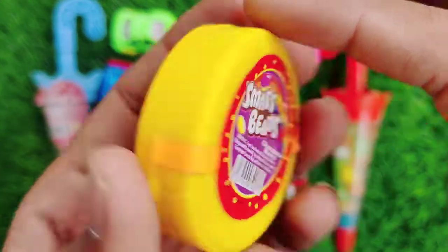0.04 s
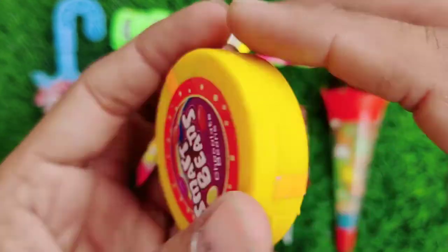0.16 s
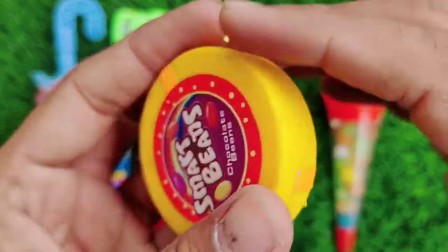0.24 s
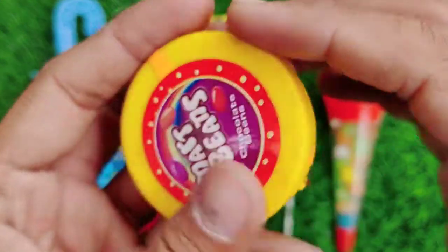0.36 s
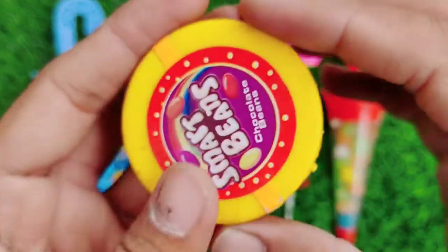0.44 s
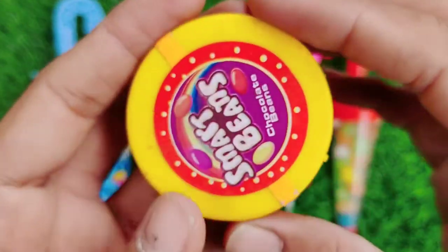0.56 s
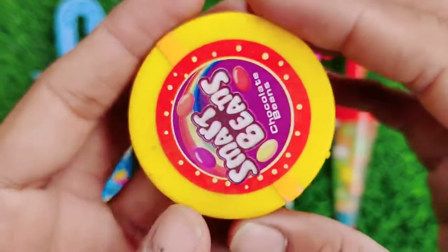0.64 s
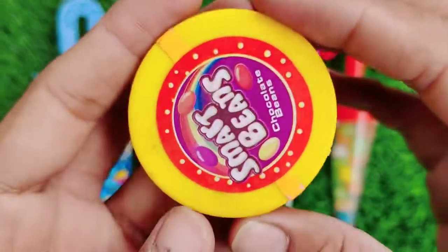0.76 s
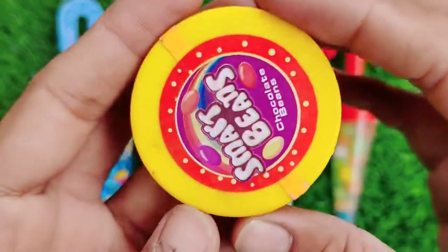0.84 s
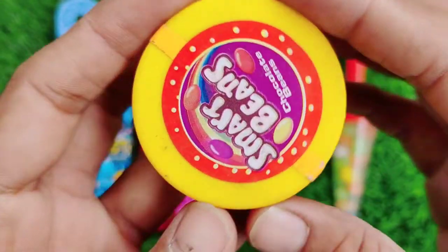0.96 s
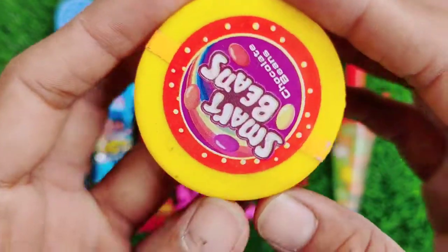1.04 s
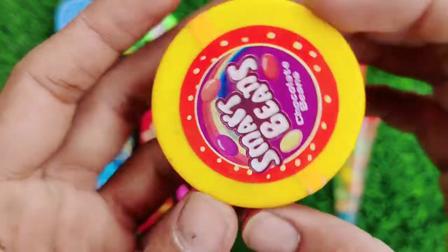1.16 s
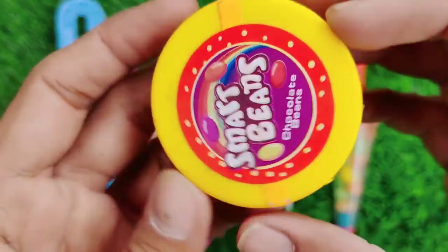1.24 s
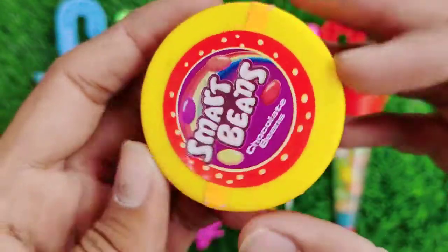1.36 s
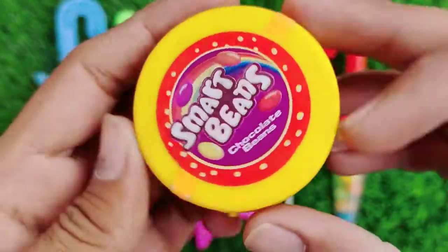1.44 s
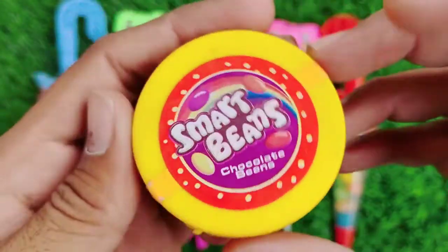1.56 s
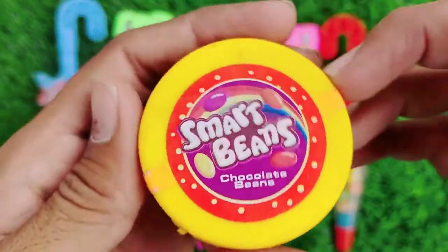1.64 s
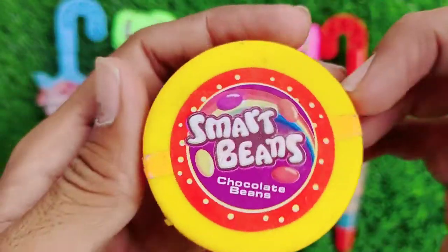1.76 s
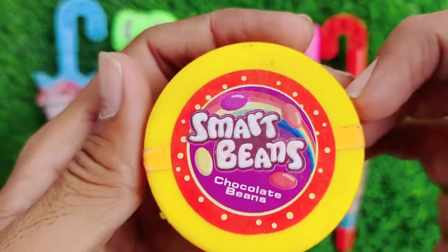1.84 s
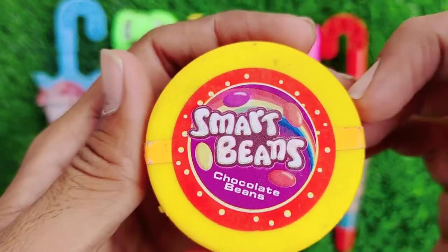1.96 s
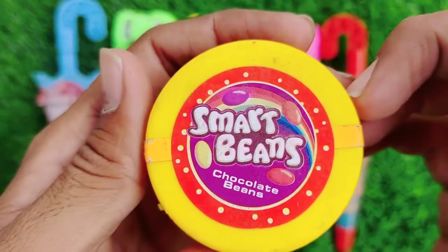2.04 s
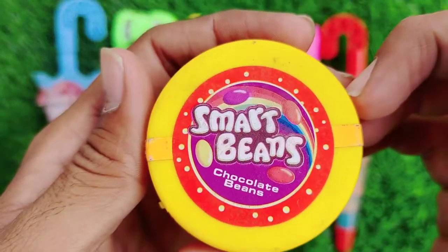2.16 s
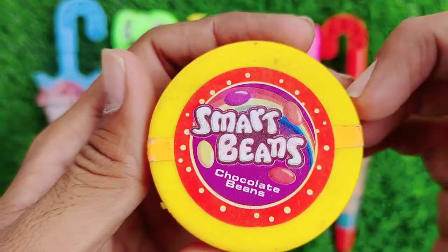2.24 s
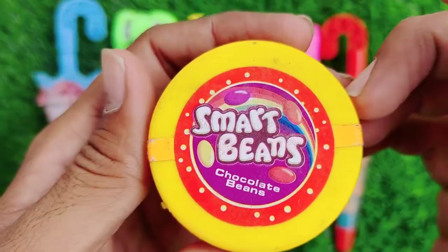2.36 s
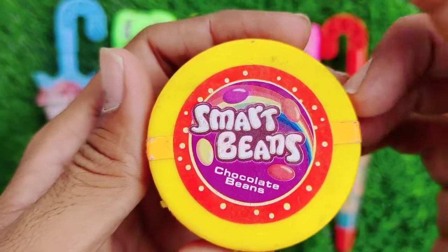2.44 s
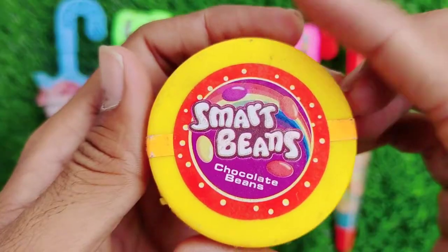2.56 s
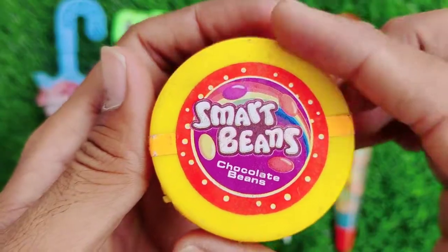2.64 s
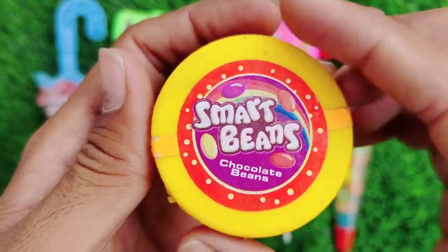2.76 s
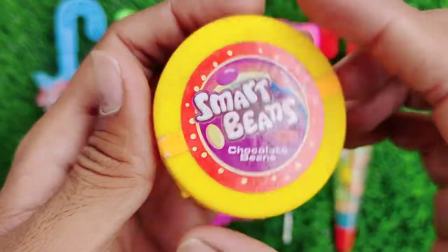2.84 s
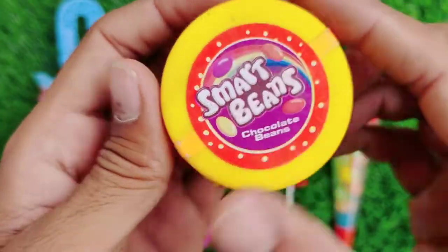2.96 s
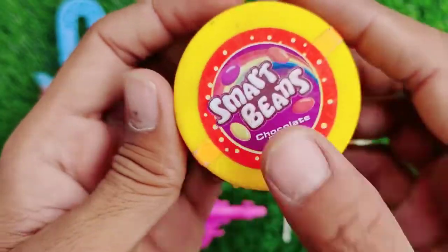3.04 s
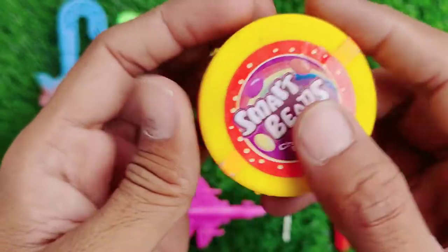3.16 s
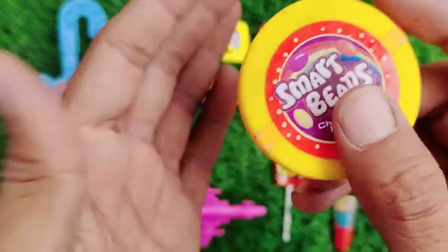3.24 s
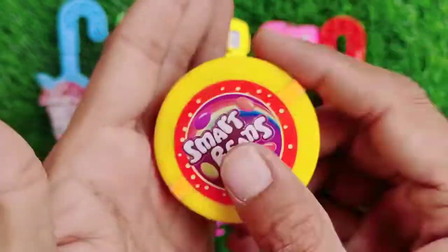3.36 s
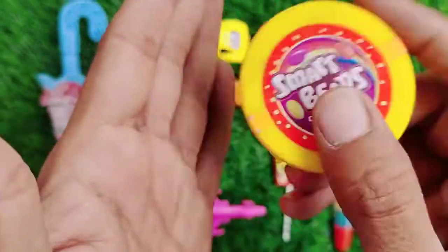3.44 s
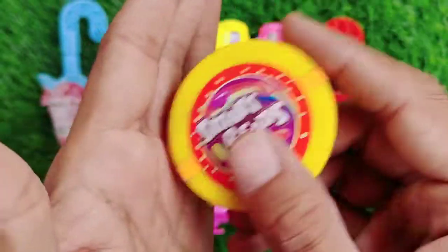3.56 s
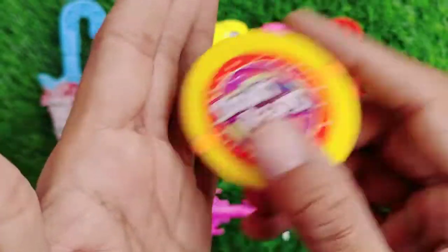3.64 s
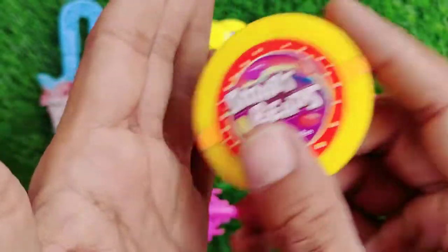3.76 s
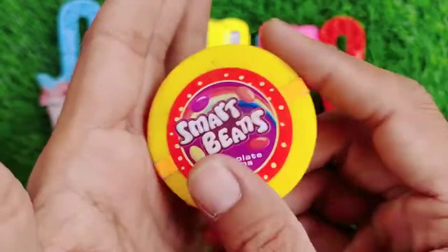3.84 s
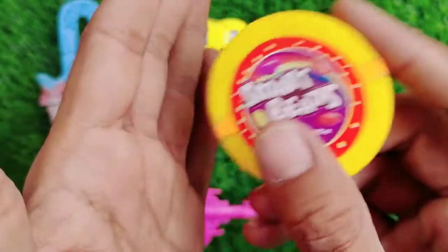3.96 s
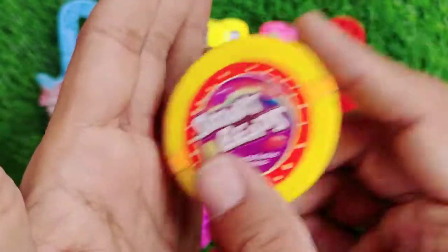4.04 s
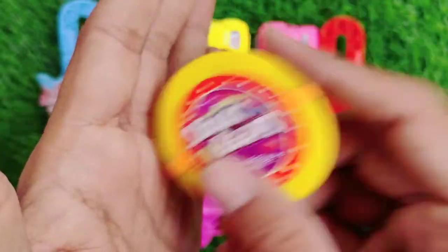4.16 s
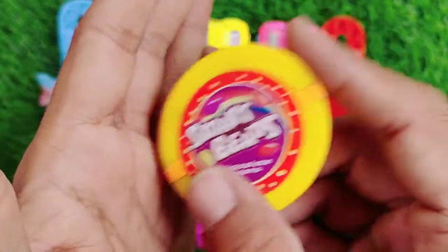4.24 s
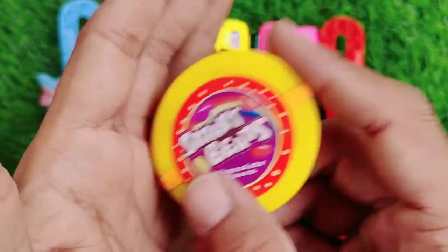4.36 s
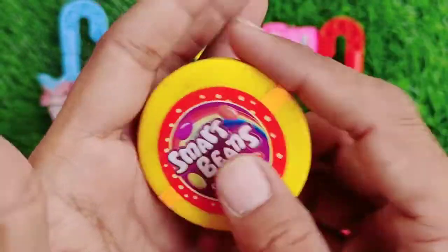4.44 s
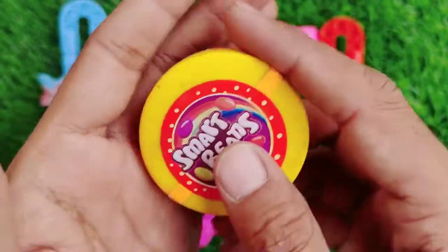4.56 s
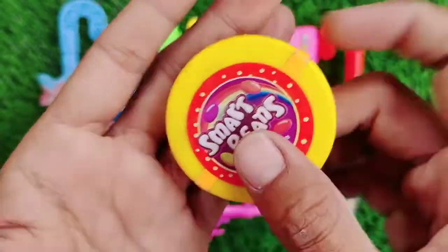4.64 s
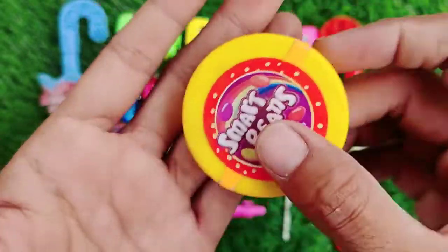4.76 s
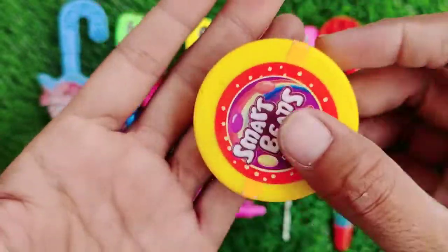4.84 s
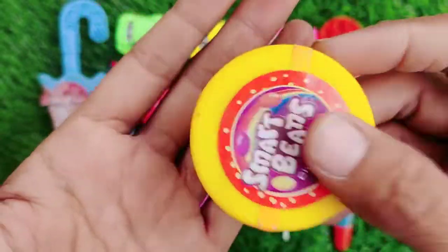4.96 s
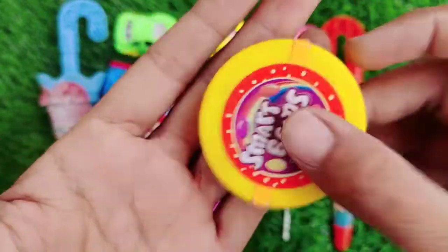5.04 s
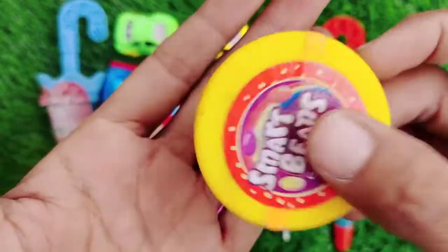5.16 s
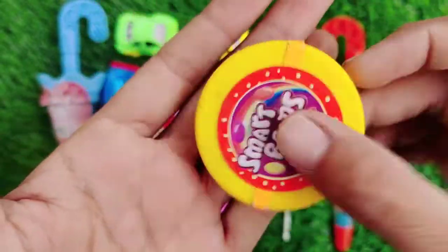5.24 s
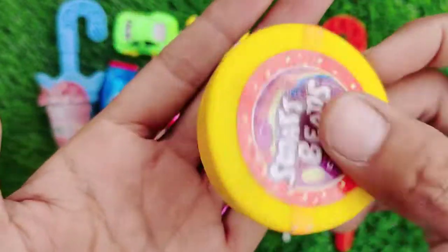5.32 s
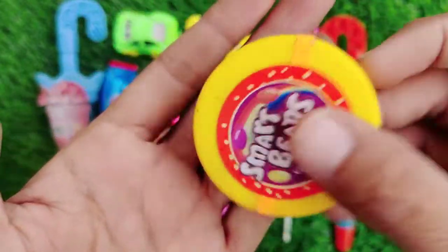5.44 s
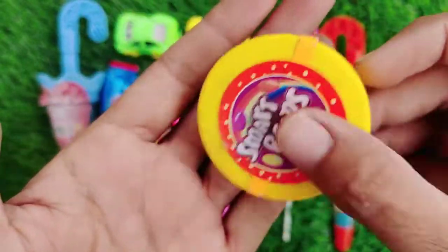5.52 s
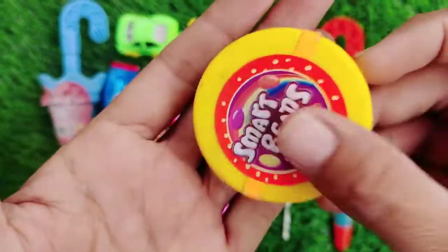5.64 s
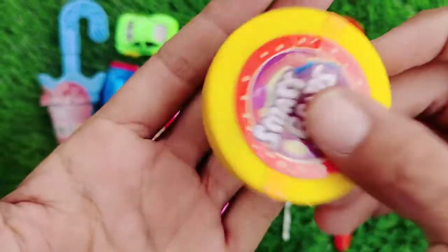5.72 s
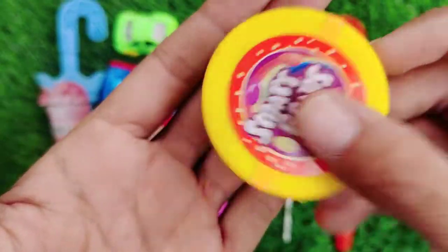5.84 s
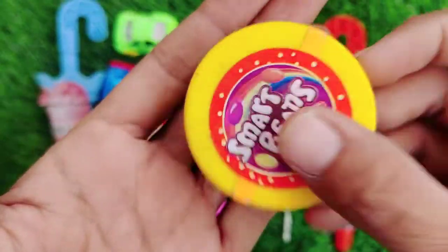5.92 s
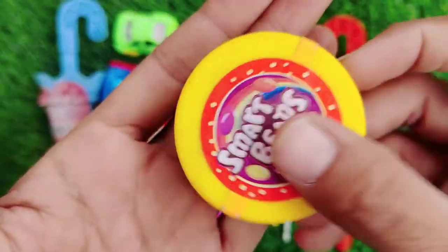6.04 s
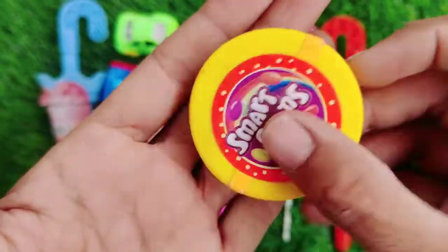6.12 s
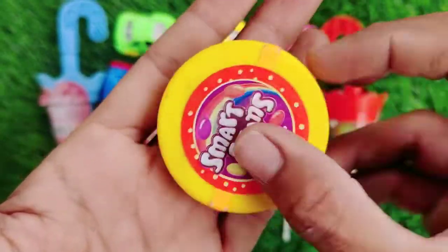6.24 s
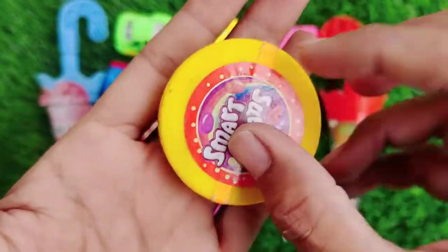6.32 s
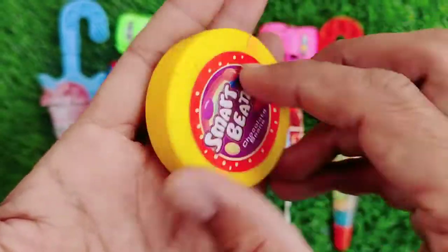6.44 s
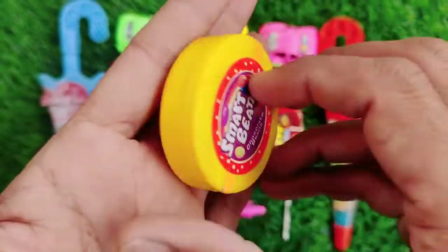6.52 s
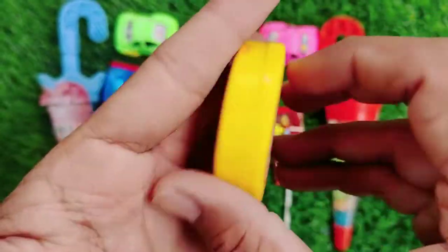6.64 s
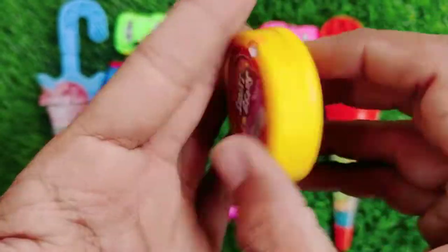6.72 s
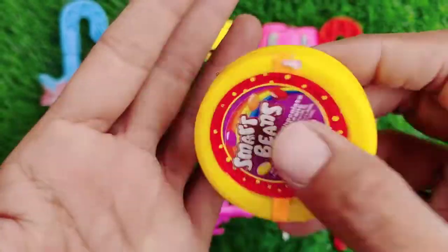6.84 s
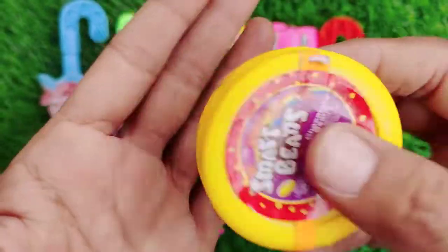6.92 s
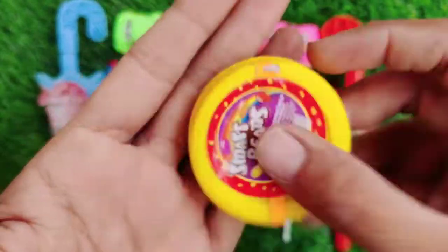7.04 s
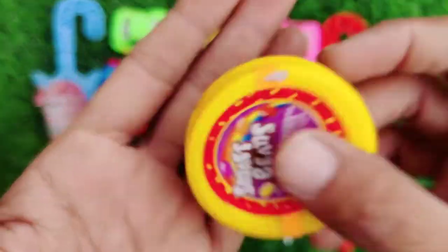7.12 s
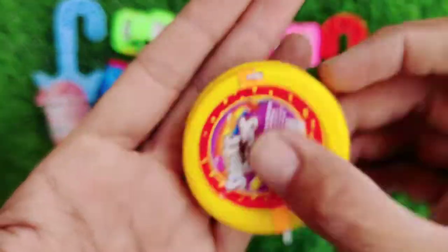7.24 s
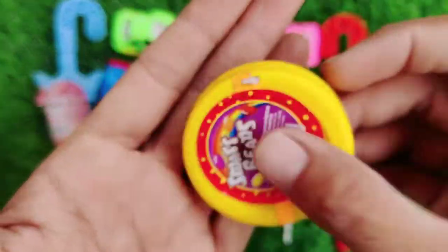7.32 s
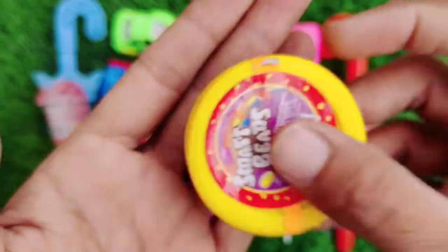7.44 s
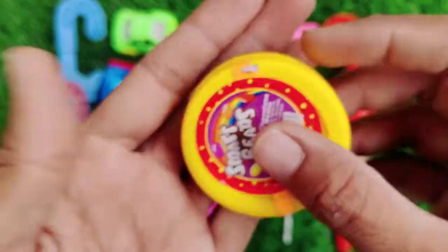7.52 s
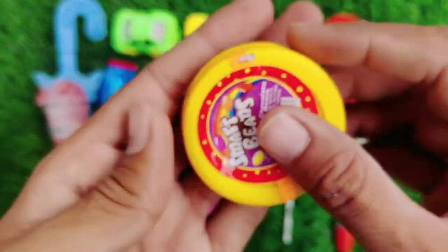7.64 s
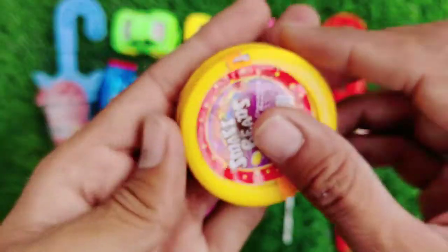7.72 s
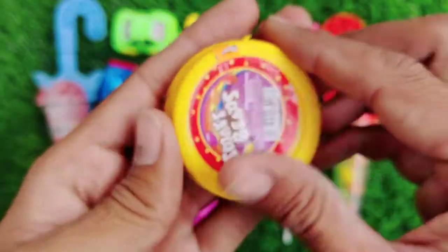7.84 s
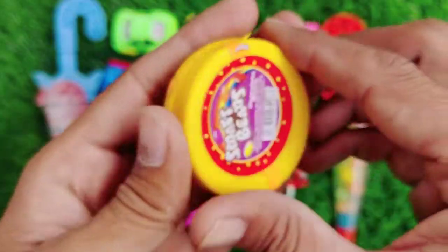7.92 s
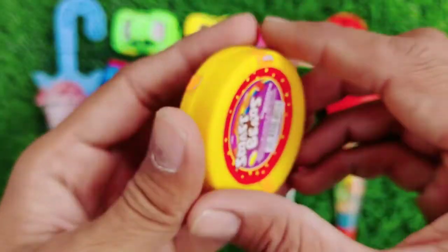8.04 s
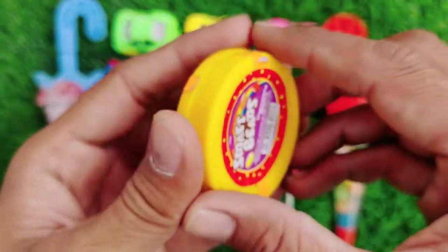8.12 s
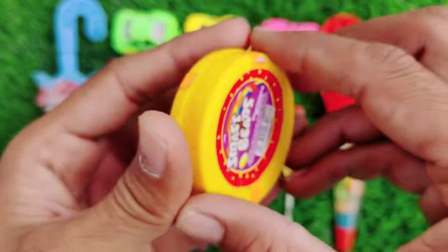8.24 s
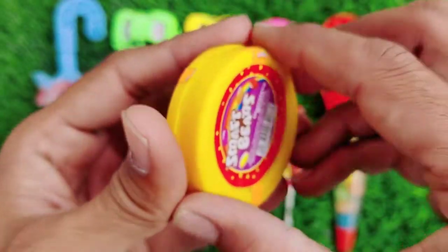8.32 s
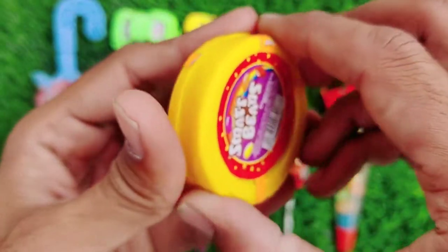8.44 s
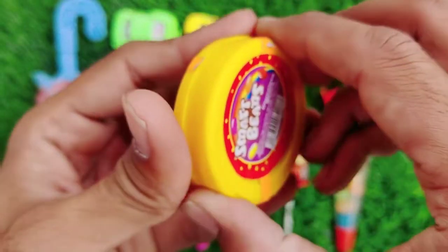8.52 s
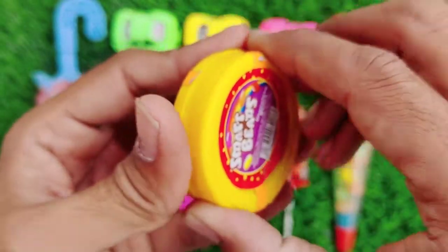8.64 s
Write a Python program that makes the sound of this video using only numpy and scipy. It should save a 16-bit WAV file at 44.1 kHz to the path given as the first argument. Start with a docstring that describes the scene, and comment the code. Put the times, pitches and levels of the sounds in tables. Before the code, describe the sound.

Small hard candies click singly in a plastic tub, pause, then rattle in loose shakes and slam in sharp jerks, very close indoors.

```python
"""Sugar-shelled beans hit the wall of a small round plastic tub, held close to a microphone indoors.
The tub is turned so that single beans drop, shaken loosely, then jerked so that the whole heap slams.
Each bean contact is a noise burst plus decaying tub modes; strokes and slams are clusters of contacts,
slams with a thud and a knock. Filtered noise makes finger rub and room air; wavering two-partial tones
make a finger squeak and a faint tone, perhaps a distant horn. The microphone overloads on the hardest blows."""
import sys
import numpy as np
from scipy import signal
from scipy.fft import rfft, irfft, next_fast_len
from scipy.io import wavfile
from scipy.ndimage import uniform_filter1d

SR = 44100
rng = np.random.default_rng(int(sys.argv[2]) if len(sys.argv) > 2 else 0)


def bounce(signal):
    """Save signal as a 16-bit WAV file at the path given by the first command-line argument."""
    frames = np.transpose(np.atleast_2d(signal))
    limited = np.clip(frames, -1, 1)
    pcm = np.round(limited * 32767).astype(np.int16)
    wavfile.write(sys.argv[1], SR, pcm)


N = 383229

# sharp jerks: landing t/s, flight/s, lift rise/s, lift tumble rms/dB, landing rms/dB,
# palm thud gain/dB, wall knock gain/dB, knock f/Hz
JERKS = [(5.0937, 0.04, .003, -20.5, -9, -63, -28.5, 1000),
         (5.2597, .044, 0.0031, -22, -7, -41, -12.5, 1210),
         (5.4016, 0.045, .009, -22, -8, -40.5, -23, 1210),
         (5.5353, 0.04, 0.0068, -22.5, -8, -59, -15, 1670),
         (5.6645, 0.045, 0.0089, -22.5, -7.5, -44, -29, 1450),
         (5.785, 0.043, 0.0068, -21.5, -7, -50, -33, 1300), (5.909, 0.041, .006, -22, -9, -56, -27, 1090),
         (6.035, 0.041, 0.0063, -23, -10, -38, -26, 1130),
         (6.149, 0.03, 0.0077, -22, -10.5, -58, -40, 1300),
         (7.0567, .028, .028, -25.5, -7.5, -31.5, -32, 980),
         (7.2176, .045, 0.015, -24, -5.5, -33.5, -18.5, 1225),
         (7.3592, 0.038, .018, -22.5, -6.5, -38, -18, 1140),
         (7.478, .029, .02, -23, -8.5, -45.5, -29, 1150)]
# loose shaking, one row per to and fro: far wall t/s, throw rms/dB, delay to near wall/s, return rms/dB
SHAKES = [(3.321, -30, 0.061, -21.5), (3.49, -23, 0.07, -23.5), (3.67, -20, 0.056, -21),
          (3.827, -21, 0.059, -21), (3.988, -21.5, 0.052, -20), (4.152, -21.5, .053, -22.5),
          (4.323, -22, 0.055, -22), (4.478, -24.5, 0.04, -31.5)]
# heap slides in the tilted tub: loudest t/s, rise/s, fall/s, rms/dB
SLIDES = [(0.184, .014, 0.038, -29.5), (4.572, 0.028, 0.015, -28), (4.772, .012, .04, -37.5),
          (4.835, .02, 0.044, -40), (6.266, 0.021, 0.025, -24), (6.342, .02, 0.031, -33),
          (6.429, 0.013, .025, -31.5), (6.488, .045, .03, -27), (6.55, .05, .13, -42),
          (6.672, 0.012, 0.029, -34), (6.823, 0.018, 0.025, -34), (7.603, .012, 0.02, -29),
          (8.009, 0.036, .19, -43)]
# lone beans drop on the wall: t/s, peak/dB, brightness/(dB/octave)
CLICKS = [(0.058, -36, -2), (0.1122, -18.5, 4), (0.1211, -11, 12), (0.1955, -10, -8.5), (0.2947, -18, -6),
          (0.331, -24, -18), (0.4222, -11.5, -2), (0.757, -28.5, -6), (0.8369, -11.5, -0.5),
          (0.851, -28, -15), (0.9087, -23.5, -16), (0.9248, -15, -9), (0.984, -27.5, -7),
          (1.2438, -25.5, -5), (1.4108, -30.5, -20), (1.4425, -22, -6), (1.504, -15.5, 10),
          (1.5308, -32, 3), (3.0843, -31, -28), (3.185, -24, -17), (3.254, -29, 2), (4.6009, -5.5, -5),
          (4.65, -19, 2), (4.7384, -24.5, -6), (4.7582, -19.5, 3), (4.8343, -12.5, -8), (4.948, -27, -24),
          (6.24, -11, 7), (6.316, -3, 7), (6.5337, -10, 0), (6.565, -14, -18), (6.611, -16.5, -9),
          (6.6447, -15.5, -7.5), (6.7735, -16.5, -6), (6.7852, -17.5, -14), (6.861, -22, -18),
          (6.9056, -19.5, -10), (6.9223, -14, -5), (7.5928, -20, -6), (7.6088, -4.5, -3),
          (7.8944, -17, 1.5), (7.9312, -30.5, -4), (8.0005, -16.5, -5), (8.0167, -14, 3),
          (8.0504, -7.5, 4.5), (8.0871, -15.5, -2), (8.1085, -15, 6.5), (8.1391, -23.5, -7.5),
          (8.189, -28.5, -23)]
# loose beans tick: start t/s, end t/s, rate/(contacts/s), typical peak/dB
STRAYS = [(0, 0.25, 60, -36.5), (3.283, 4.659, 140, -24.5), (5.045, 6.306, 30, -34), (6.332, 6.73, 70, -30),
          (6.993, 7.604, 69, -27.5)]
# modes of tub and lid: mean f/Hz, t60/s, relative level/dB
TUB_MODES = [(1687, 0.019, 3.5), (2060, 0.022, -1), (2300, 0.0087, 4.5), (2696, 0.017, 7.5),
             (3258, 0.015, 6.5), (3635, 0.022, 9), (3785, 0.017, 7), (4068, 0.013, 7), (4612, 0.0064, 6),
             (4597, 0.0069, 3), (4970, 0.0096, 4.5), (5620, 0.0053, -4), (6643, 0.0052, 3.5),
             (6937, 0.0081, 1), (7316, 0.013, -1), (7657, 0.0028, 0), (8920, 0.011, -13), (9330, 0.011, -3)]
# broad colour of a contact: f/Hz, relative level/dB
CONTACT_COLOUR = [(200, -50.5), (1000, -32), (1500, -28), (2200, -20.5), (3150, -16), (3800, -8.5),
                  (4560, 5.5), (5700, -3.5), (6980, 6.5), (8100, -1.5), (9500, -13), (12000, -19.5),
                  (15300, -29)]
# finger rub on plastic: t/s, level before grain/dB
RUB = [(0, -56.5), (.4, -56.5), (.62, -71), (.85, -58), (1.2, -61.5), (1.6, -63), (1.95, -96.5),
       (2.45, -74), (2.8, -64), (3.2, -57.5), (5, -58.5), (7.7, -59), (8.3, -61), (8.65, -71),
       (8.668, -42.5), (8.69, -55)]
# colour of the rub: f/Hz, relative level/dB
SKIN_COLOUR = [(1000, -31), (3000, -17.5), (4450, -2.5), (5750, -17.5), (7050, -7.5), (9000, -22),
               (15000, -41.5)]
# faint tones, a finger squeak on plastic, then a lower tone, perhaps a distant horn:
# start t/s, length/s, mean f/Hz, rms/dB
FAINT_TONES = [(1.046, 0.16, 2900, -68), (2.645, 0.28, 1117, -72.5)]
# colour of the room air: f/Hz, relative level/dB
AIR_COLOUR = [(28, -27), (60, -6.5), (110, 0), (210, -3.5), (400, -7.5), (1000, -14), (2400, -16),
              (3400, -13.5), (4400, -4), (5800, -22.5), (7100, -10.5), (9000, -24.5), (12000, -25.5),
              (15400, -32)]

AIR_RMS_DB = -60.5
RING_SAMPLES = 1024  # length of one contact
TOP_HZ = 15700
# the throw is brisk, the return lazier
THROW_RISE_S, THROW_FALL_S, RETURN_RISE_S, RETURN_FALL_S = 0.039, 0.028, 0.046, 0.04
LIFT_FALL_S = 0.034  # the lift clatter dies away in flight
# the harder the heap lands, the less is left to settle
TYPICAL_LANDING_DB, SETTLE_DB, SETTLE_DB_PER_DB = -8, -28.5, -1.5


def undb(db):
    """Decibels to gain."""
    return 10 ** (np.asarray(db) / 20)


def unit(x):
    """Scale to rms 1."""
    return x / np.sqrt(np.mean(x ** 2))


def add(out, start_s, x):
    """Mix x into out from start_s on."""
    i = max(int(start_s * SR), 0)
    out[i:i + len(x)] += x[:max(len(out) - i, 0)]


def spectrum_db(points, size):
    """Interpolate an (f/Hz, level/dB) outline onto FFT bins, on a log frequency axis."""
    hz, db = np.transpose(points)
    bins_hz = np.fft.rfftfreq(size, 1 / SR)
    return np.interp(np.log(bins_hz + 1), np.log(hz), db)


def noise(points):
    """Steady noise of the given colour, rms 1."""
    size = next_fast_len(N)
    white = rfft(rng.standard_normal(size))
    return unit(irfft(white * undb(spectrum_db(points, size)), size)[:N])


def causal(db):
    """Minimum-phase responses with these gains, by cepstral folding: no sound before the blow."""
    half = RING_SAMPLES // 2
    cepstrum = irfft(np.log(undb(db)))
    cepstrum[..., 1:half] *= 2
    cepstrum[..., half + 1:] = 0
    return np.exp(rfft(cepstrum))


def contacts(bright, ring_db=-14, tick_db=10, detune=0.033):
    """One bean contact per brightness, peak 1: tick, noisy shell crack and decaying tub modes."""
    count = len(bright)
    t = np.arange(RING_SAMPLES) / SR
    # square hits end at once, glancing ones scrape longer
    crack_s = rng.uniform(0.0004, 0.0016, (count, 1))
    wave = rng.standard_normal((count, RING_SAMPLES)) * np.exp(-t / crack_s)
    wave[:, 0] += undb(tick_db)
    # each spot favours other modes; resting beans shift their pitch
    for hz, t60_s, db in TUB_MODES:
        share, shift = rng.standard_normal((2, count, 1))
        phase = (2 * np.pi * hz * (1 + detune * shift) * t).astype(np.float32)
        decay = np.exp(-np.log(1000) * t / t60_s)
        wave += share * undb(ring_db + db) * decay * np.sin(phase)
    # shell on shell is bright, shell on plastic duller
    bins_hz = np.fft.rfftfreq(RING_SAMPLES, 1 / SR)
    octaves = np.log2(np.clip(bins_hz, 3800, 8000) / 5500)
    colour_db = spectrum_db(CONTACT_COLOUR, RING_SAMPLES) + np.outer(bright, octaves)
    wave = irfft(rfft(wave) * causal(colour_db))
    return wave / np.abs(wave).max(axis=1, keepdims=True)


def cluster(delays_s, sizes, bright, length_s):
    """Sum many contacts; total energy equals rms 1 over length_s."""
    out = np.zeros(int(delays_s.max() * SR) + RING_SAMPLES + 1)
    for delay_s, size, wave in zip(delays_s, sizes, contacts(bright)):
        add(out, delay_s, size * wave)
    return out / np.sqrt(np.sum(out ** 2) / (length_s * SR))


def tumble(rise_s, fall_s, db, per_s=520, bright_mean=1, force_bright=0.77, scatter_db=8):
    """Contacts swell to a loudest moment and die away; harder tumbles are brighter."""
    first_db, last_db = -16, -20
    length_s = rise_s + fall_s
    count = int(per_s * length_s) + 4
    delays_s = length_s * (np.arange(count) + rng.random(count)) / count
    swell_db = np.interp(delays_s, [0, rise_s, length_s], [first_db, 0, last_db])
    sizes = undb(swell_db + scatter_db * np.clip(rng.standard_normal(count), -2, 1.3))
    bright = bright_mean + force_bright * (db + 20) + 4.5 * rng.standard_normal(count)
    return undb(db) * cluster(delays_s, sizes, bright, length_s)


def stroke(rise_s, fall_s, db, hard_db=17, hard_bright=12, spread=0.31, count=3):
    """A driven tumble: near its loudest moment a few beans strike the wall squarely and stand out."""
    out = np.pad(tumble(rise_s, fall_s, db), (0, RING_SAMPLES))
    place = (np.arange(count) + rng.random(count)) / count
    times_s = rise_s + spread * (place * (rise_s + fall_s) - rise_s)
    hits = contacts(hard_bright + 5 * rng.standard_normal(count))
    for hit_s, hit in zip(times_s, hits):
        add(out, hit_s, undb(db + hard_db + rng.standard_normal()) * hit)
    return out


def heap_landing(landing_s=0.0085, fall_s=0.0042, bright=-2):
    """The heap hits the wall: dense contacts of falling size within milliseconds, rms 1."""
    delays_s = landing_s * np.linspace(0, 1, 22) ** 1.4 + rng.uniform(0, 0.0003, size=22)
    sizes = np.exp(-delays_s / fall_s)
    return cluster(delays_s, sizes, np.full(len(delays_s), bright), landing_s)


def thud_and_knock(thud_db, knock_db, knock_hz, thud_s=0.00092, knock_s=0.0018):
    """The tub pushes into the palm and springs back; its wall gives a dead, damped-sine knock."""
    t = np.arange(RING_SAMPLES) / SR
    thud = t / thud_s * (2 - t / thud_s) * np.exp(1 - t / thud_s)
    knock = np.sin(2 * np.pi * knock_hz * t) * np.exp(-t / knock_s)
    return undb(thud_db) * thud + undb(knock_db) * knock


def settling(settle_s=0.071, fall_s=0.023, bright=-3):
    """Beans jostle to rest: scattered contacts of decaying size, rms 1 over half of settle_s."""
    delays_s = rng.uniform(0, settle_s, size=30)
    sizes = np.exp(-delays_s / fall_s) * undb(4 * rng.standard_normal(len(delays_s)))
    return cluster(delays_s, sizes, np.full(len(delays_s), bright), settle_s / 2)


def slams(landing_s=0.0085, lead_s=0.0042, lead_db=-22):
    """A jerk lifts the heap; it flies, slams on the wall, thuds in the palm and settles."""
    out = np.zeros(N)
    for land_s, flight_s, rise_s, lift_db, db, thud_db, knock_db, knock_hz in JERKS:
        add(out, land_s - flight_s - rise_s, stroke(rise_s, LIFT_FALL_S, lift_db))
        # a few beans arrive ahead of the heap
        early = cluster(rng.uniform(0, lead_s, size=3), np.ones(3), np.zeros(3), lead_s)
        add(out, land_s - lead_s, undb(lead_db) * early)
        add(out, land_s, undb(db) * heap_landing(landing_s))
        add(out, land_s, thud_and_knock(thud_db, knock_db, knock_hz))
        settle_db = SETTLE_DB + SETTLE_DB_PER_DB * (db - TYPICAL_LANDING_DB)
        add(out, land_s + landing_s, undb(settle_db) * settling())
    return out


def shaking():
    """Each shake throws the beans at the far wall and brings them back: two strokes."""
    out = np.zeros(N)
    for far_s, throw_db, back_s, return_db in SHAKES:
        add(out, far_s - THROW_RISE_S, stroke(THROW_RISE_S, THROW_FALL_S, throw_db))
        add(out, far_s + back_s - RETURN_RISE_S, stroke(RETURN_RISE_S, RETURN_FALL_S, return_db))
    return out


def sliding():
    """The heap slips across the tilted tub: sparser tumbles without square hits."""
    out = np.zeros(N)
    for peak_s, rise_s, fall_s, db in SLIDES:
        slide = tumble(rise_s, fall_s, db, per_s=400, bright_mean=1.5, force_bright=0.61, scatter_db=7.5)
        add(out, peak_s - rise_s, slide)
    return out


def single_beans(rebound_db=-26, rebound_s=0.0069):
    """Lone hits, each with a soft rebound after 0.5 to 1.5 times rebound_s."""
    out = np.zeros(N)
    starts_s, peaks_db, bright = np.transpose(CLICKS)
    waits_s = rebound_s * (0.5 + rng.random(len(starts_s)))
    hits, rebounds = contacts(bright), contacts(bright)
    for start_s, gain, wait_s, hit, rebound in zip(starts_s, undb(peaks_db), waits_s, hits, rebounds):
        add(out, start_s, gain * hit)
        add(out, start_s + wait_s, gain * undb(rebound_db) * rebound)
    return out


def stray_beans(scatter_db=4, bright_mean=-3):
    """Soft contacts at random moments while the tub moves."""
    out = np.zeros(N)
    for start_s, end_s, per_s, db in STRAYS:
        count = int(per_s * (end_s - start_s)) + 1
        size, tilt = rng.standard_normal((count, 2)).T
        hits = contacts(bright_mean + 4 * tilt)
        times_s = rng.uniform(start_s, end_s, count)
        for hit_s, gain, hit in zip(times_s, undb(db + scatter_db * size), hits):
            add(out, hit_s, gain * hit)
    return out


def finger_rub(grain, grain_db=4.0):
    """Skin slides on the tub: coloured noise with grainy level."""
    t = np.arange(N) / SR
    rub_db = np.interp(t, *np.transpose(RUB))
    return noise(SKIN_COLOUR) * undb(rub_db + grain_db * grain)


def faint_tones(grain, waver=0.0135, overtone_db=-8):
    """Two-partial tones of wavering pitch: a finger squeak, then a tone, perhaps a distant horn."""
    out = np.zeros(N)
    for start_s, length_s, hz, db in FAINT_TONES:
        count = int(length_s * SR)
        pitch_hz = hz * (1 + waver * grain[:count])
        phase = 2 * np.pi * np.cumsum(pitch_hz) / SR
        tone = np.sin(phase) + undb(overtone_db) * np.sin(2 * phase)
        add(out, start_s, undb(db) * unit(np.hanning(count) * tone))
    return out


def decaying_noise(t, t60_s):
    """Reflections as exponentially decaying noise after a 3 ms gap, energy 1."""
    tail = rng.standard_normal(len(t)) * np.exp(-np.log(1000) * t / t60_s) * (t > 0.003)
    return tail / np.linalg.norm(tail)


def room(x, early_db=-19, early_t60_s=0.08, late_db=-29, late_t60_s=0.29):
    """Quick reflections from hands and table, then a faint band-passed tail from the walls."""
    t = np.arange(SR // 2) / SR
    band = signal.butter(2, [3300, 7800], "band", fs=SR, output="sos")
    early = decaying_noise(t, early_t60_s)
    late = signal.sosfilt(band, decaying_noise(t, late_t60_s))
    response = undb(early_db) * early + undb(late_db) * late
    return x + signal.fftconvolve(x, response)[:N]


def room_air():
    """Steady coloured background noise."""
    return undb(AIR_RMS_DB) * noise(AIR_COLOUR)


def scene():
    """Beans with room reflections, plus finger rub, faint tones and room air; one channel."""
    beans = room(slams() + shaking() + sliding() + single_beans() + stray_beans())
    # smoothed noise, rms 1: roughens the rub level and the tone pitch
    grain = unit(uniform_filter1d(rng.standard_normal(N), size=400))
    return (beans + finger_rub(grain) + faint_tones(grain) + room_air())[None]


def record(dry):
    """The microphone saturates smoothly on the hardest blows; then bass and top are cut."""
    ceiling = 0.76
    clipped = dry / (1 + (dry / ceiling) ** 8) ** (1 / 8)
    bass_cut = signal.butter(2, 70, "high", fs=SR, output="sos")
    top_cut = signal.ellip(8, 0.2, 80, TOP_HZ, fs=SR, output="sos")
    return signal.sosfilt(top_cut, signal.sosfilt(bass_cut, clipped))


dry = scene()
out = record(dry)
bounce(out)
```